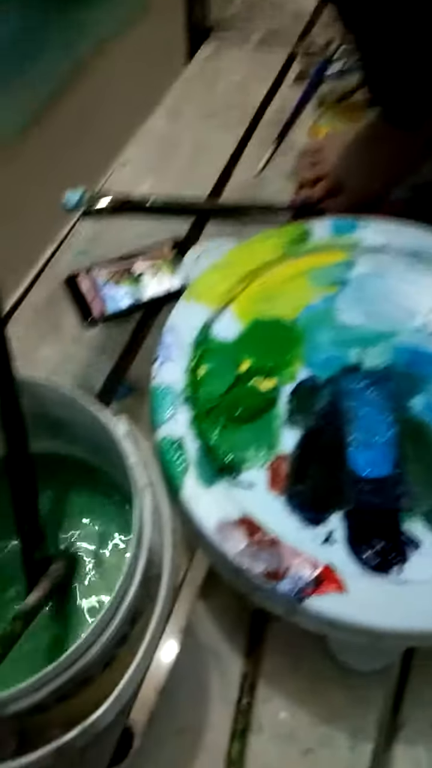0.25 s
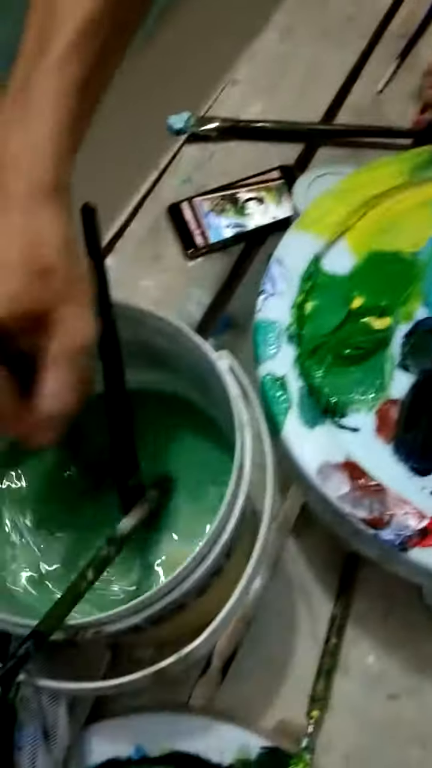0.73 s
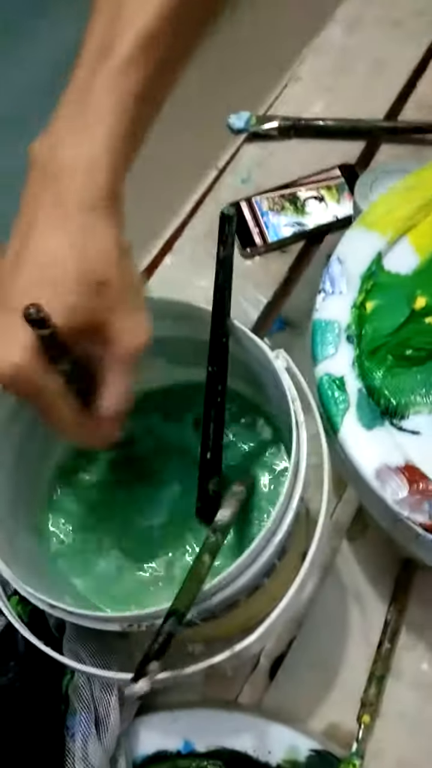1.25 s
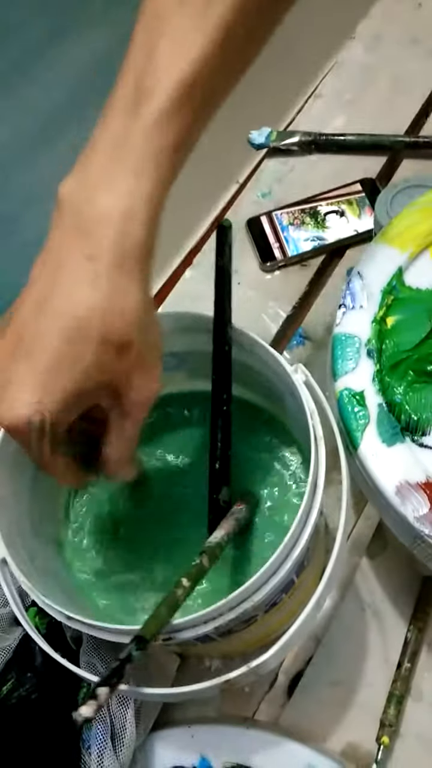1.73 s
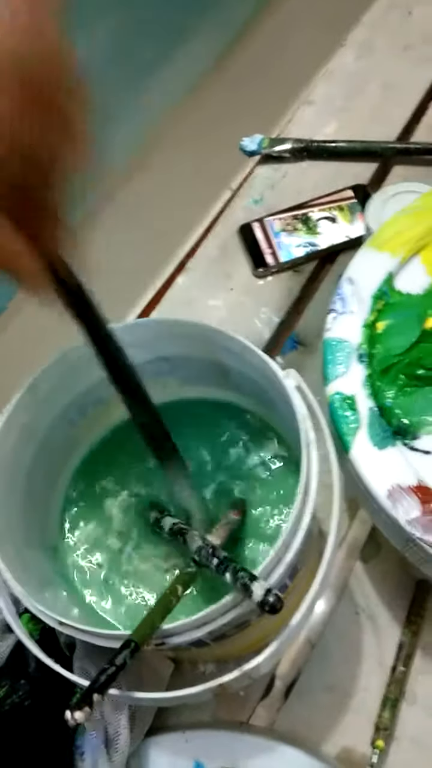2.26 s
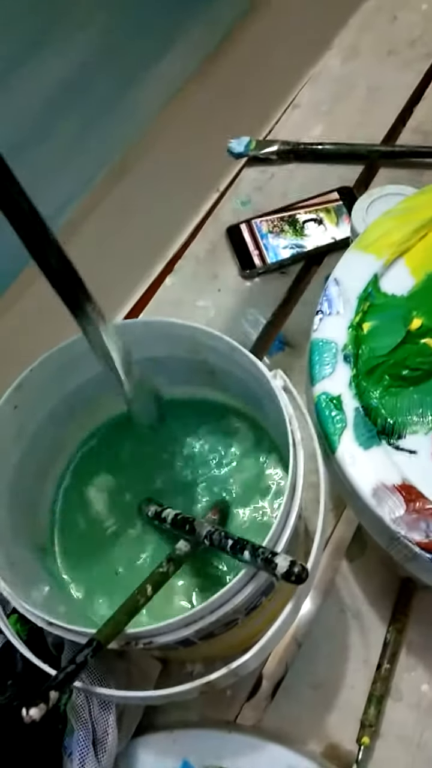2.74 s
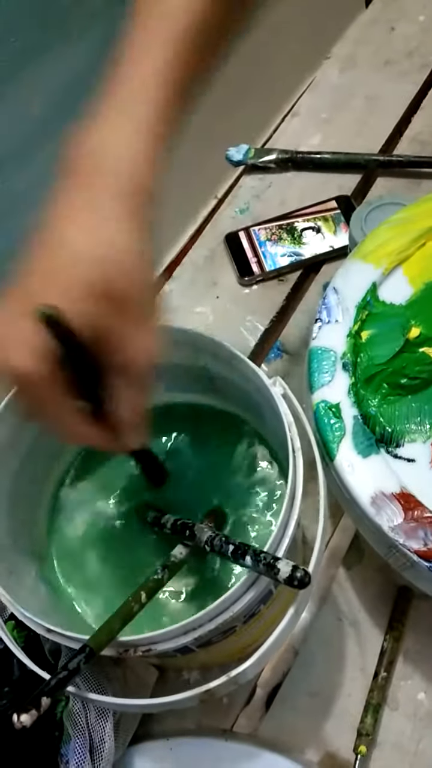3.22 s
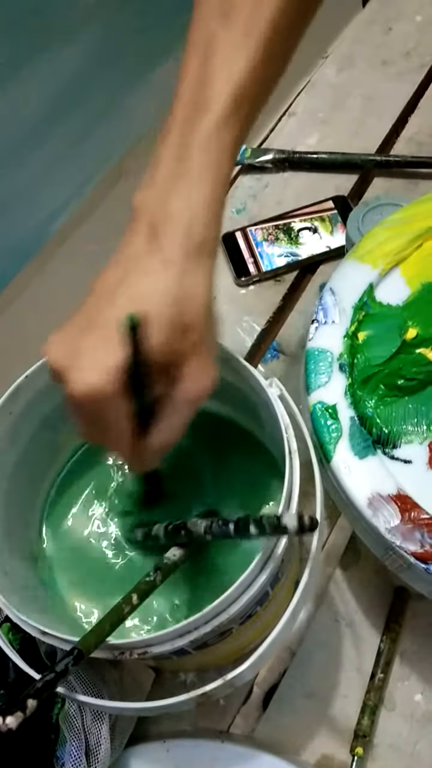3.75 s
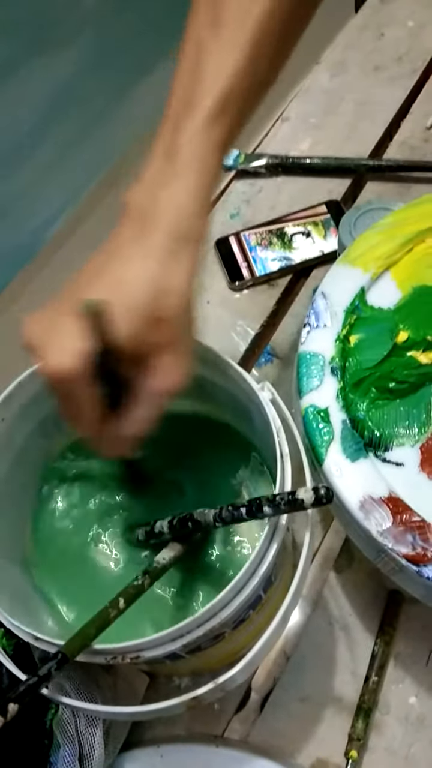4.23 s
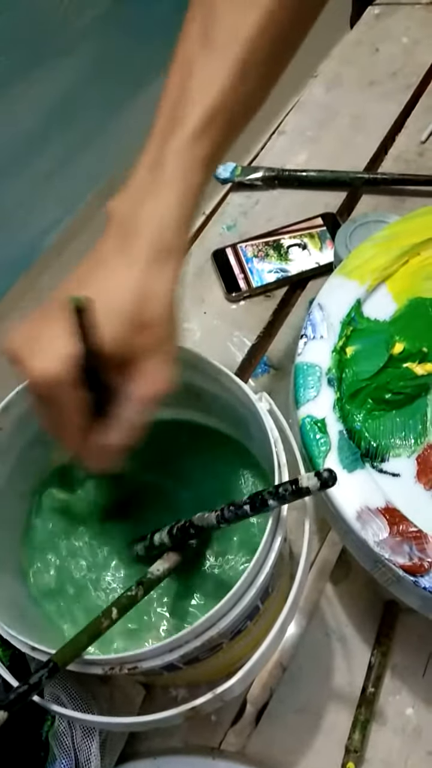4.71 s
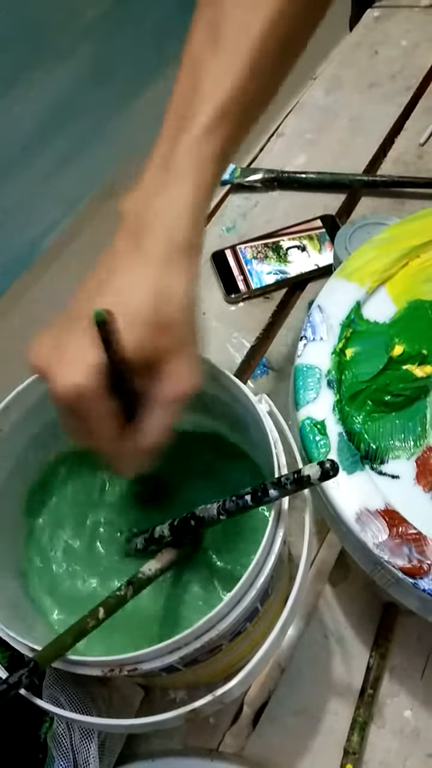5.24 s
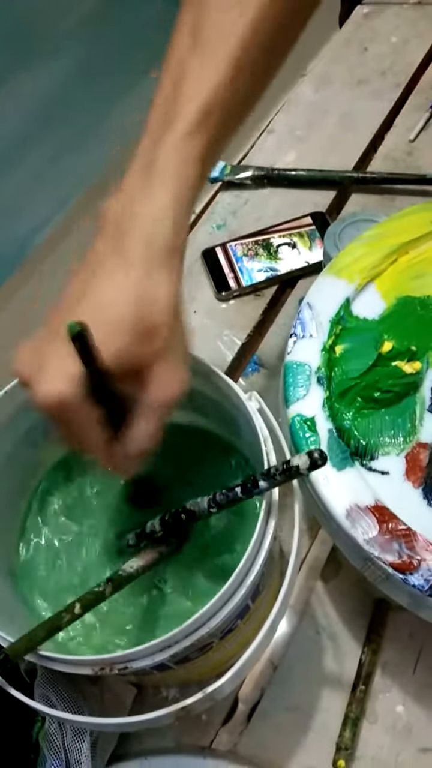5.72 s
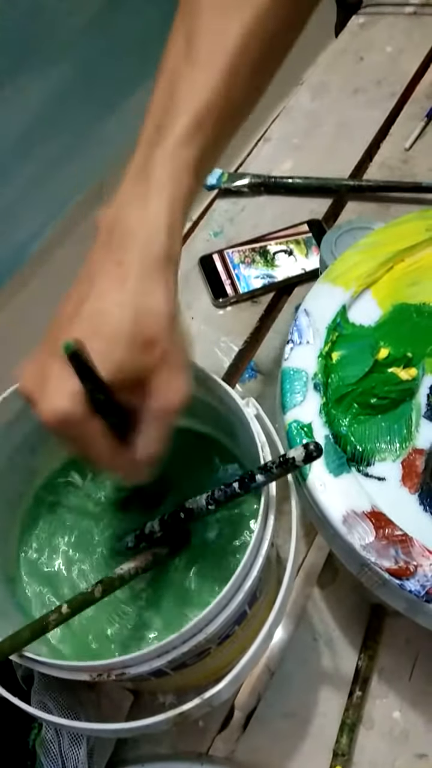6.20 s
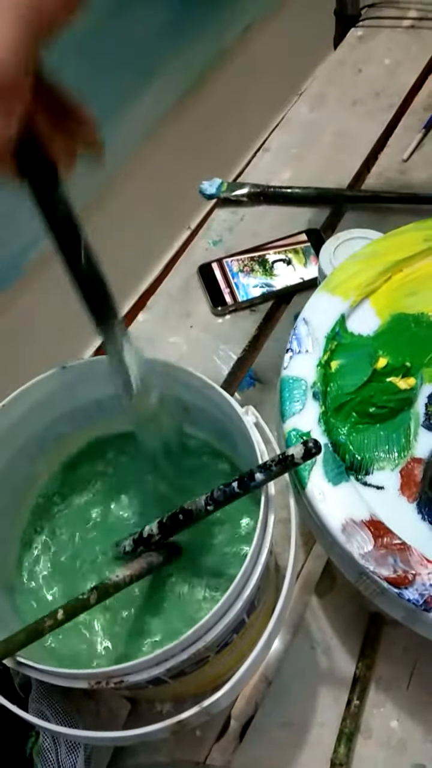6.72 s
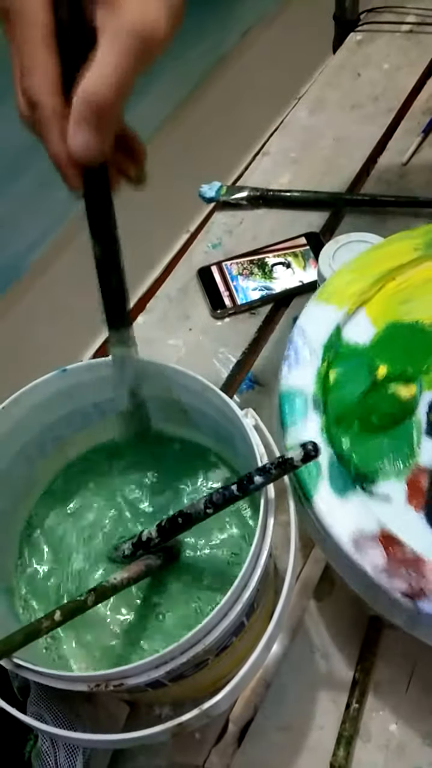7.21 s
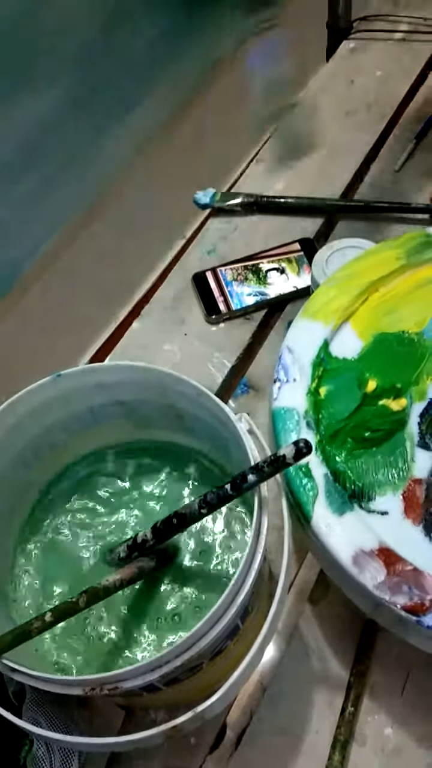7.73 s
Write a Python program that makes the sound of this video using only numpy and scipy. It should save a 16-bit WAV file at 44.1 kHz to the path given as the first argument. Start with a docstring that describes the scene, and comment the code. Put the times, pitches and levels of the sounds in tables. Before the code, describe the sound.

A phone held near a water bucket picks up thin brush handles clicking on its rim and each other, with small thuds in the bench below. Light swishing grows into bubbling, gurgling rinsing and a clatter of knocks, then calms. Two hard, dry taps follow, with a few faint ticks. A live bare room adds short reflections and a diffuse tail; soft hiss and low hum stay underneath.

```python
"""Brush handles clack on a bucket rim and on each other, in a bare room above steady hiss and faint hum.
The water-filled plastic wall bongs, the bench thumps, bubbles plop and bristles crackle as brushes are rinsed.
Blows and contacts drive decaying modes; bubbles are rising tones; bristle crackle is short noise.
The room adds near echoes and a diffuse tail; hiss is shaped noise and hum is narrow-band noise."""
import sys
import numpy as np
from scipy import signal
from scipy.fft import rfft, irfft
from scipy.io import wavfile

SR = 44100
rng = np.random.default_rng(int(sys.argv[2]) if len(sys.argv) > 2 else 0)


def persist_wave(psi):
    """Save psi, clipped to +-1, as 16-bit WAV."""
    counts = np.round(np.clip(psi, -1, 1) * 32767).astype(np.int16)
    wavfile.write(sys.argv[1], SR, np.atleast_2d(counts).T)


N = 351036
SECONDS = np.arange(N) / SR

# Background hiss spectrum before level setting. Each row: frequency in Hz, relative density in dB.
HISS_SPECTRUM = [(20, -40), (42, -24), (55, -11.5), (92, -3.5), (153, -10.5), (213, -4), (400, -8),
                 (515, -6), (987, -14), (1940, -11), (3300, -13), (3800, -15), (6500, -14.5), (7300, -24),
                 (8200, -36.5), (11500, -49), (15500, -46.5)]
# Hums of a distant machine. Each row: centre in Hz, width in Hz, RMS level in dB.
HUMS = [(102, 42, -75), (202.7, 12.5, -60), (439, 33, -62.5)]
# How hard the water is stirred. Each row: time in seconds, slosh level in dB.
STIRRING = [(0, -55.5), (.9, -60), (1.15, -53.5), (1.6, -56), (2.5, -58.5), (3.35, -60.5), (3.8, -56.5),
            (4.15, -52), (4.6, -54), (4.85, -43), (5.15, -47), (5.4, -52), (5.9, -56.5), (6.33, -43.5),
            (6.5, -48.5), (6.65, -59), (7.96, -57.5)]
# Single bubbles. Each row: start in seconds, level in dB, start pitch in Hz.
BUBBLES = [(1.38, -34.5, 2640), (1.6724, -30, 2320), (1.709, -24.5, 2040), (4.081, -26.5, 1294),
           (4.09, -31, 3260), (4.113, -29, 2840), (4.138, -26.5, 1970), (4.4072, -35, 1310),
           (4.4827, -20.5, 1290), (4.5413, -34, 906), (4.712, -19.5, 1146), (4.8276, -14, 1880),
           (4.924, -25.5, 1260), (4.947, -29, 1486), (5.0798, -26, 1810), (5.102, -25, 1880),
           (5.1507, -35, 1980), (5.2185, -28.5, 1975), (5.329, -31.5, 3010), (5.427, -33.5, 1865),
           (5.461, -38.5, 2820), (5.5823, -30, 1260), (5.675, -34, 2010), (5.8735, -34, 1900),
           (5.938, -35, 1960), (6.167, -33, 1850), (6.253, -27, 2930), (6.359, -29.5, 1850),
           (6.417, -27.5, 1815), (6.4527, -32, 1960), (6.531, -35.5, 3270), (7.277, -32.5, 1790),
           (7.45, -32, 1800)]
# Drips and gulps whose cavity closes fast. Each row: start in seconds, level in dB, start pitch in Hz,
# ring time in seconds.
DRIP_EVENTS = [(4.3368, -34.5, 1957, 0.04), (4.92, -34, 1127, 0.1), (6.284, -39, 680, 0.085),
               (6.5298, -28.5, 1820, 0.042)]
# Blows that ring the bucket wall. Each row: start in seconds, peak in dB, gain added to lowest mode in dB.
WALL_BLOWS = [(3.969, -37, -16), (4.11, -28.5, -15), (4.15, -38.5, -7), (4.19, -38, -14), (4.267, -40, -19),
              (4.349, -37, -12), (4.804, -34, -14), (4.839, -32, -10), (5.061, -20, -2), (6.281, -34, 5),
              (6.32, -22, 7), (6.443, -34, 8)]
# Blows that go into the bench. Each row: start in seconds, peak in dB.
BENCH_BLOWS = [(0.364, -44), (0.469, -47), (1.045, -30.5), (1.833, -42), (1.906, -26), (1.968, -31),
               (2.246, -42.5), (2.918, -32), (3.404, -37.5), (3.714, -35.5), (3.851, -34), (7.246, -21.5),
               (7.427, -20)]
# Bristles snapping free. Each row: start in seconds, mode peak in dB, treble edge peak in dB.
BRISTLE_SNAPS = [(1.326, -44, -56), (1.565, -46, -66), (2.803, -40.5, -53), (4.136, -29, -48),
                 (4.318, -36.5, -55), (4.451, -36, -50), (4.5405, -32.5, -60), (4.604, -35, -70),
                 (4.793, -17.5, -47), (5.049, -28, -61), (5.156, -40, -53), (5.2998, -29.5, -62),
                 (5.862, -44, -62), (6.045, -34, -59), (6.1438, -30, -58), (6.1657, -26, -43),
                 (6.219, -31, -76), (6.2534, -39, -72), (6.2648, -26.5, -75), (6.363, -36, -58),
                 (6.469, -34, -72), (7.408, -47, -53)]
# The brush rapped dry on the rim. Each row: start in seconds, hard-mode peak in dB.
RIM_RAPS = [(7.2461, -12.5), (7.427, -11.5), (7.473, -28.5)]
# Handle clacks. Each row: start in seconds, middle peak in dB, low peak in dB, hard peak in dB,
# favoured middle frequency in Hz, favoured hard frequency in Hz.
HANDLE_CLACKS = [(0.3009, -31.5, -45, -26.5, 2000, 5840), (0.9158, -37, -58, -32, 2200, 5440),
                 (1.03, -35, -49, -36, 2600, 5800), (1.043, -13.5, -25, -16.5, 2600, 4500),
                 (1.1655, -29.5, -52, -31, 2090, 4300), (1.666, -35, -64, -30.5, 2250, 5400),
                 (1.909, -7, -22, -3, 2270, 5930), (1.964, -35, -28.5, -15.5, 2180, 4050),
                 (2.247, -34, -55, -38, 2860, 4200), (2.4184, -39.5, -49, -47, 1730, 4100),
                 (2.9171, -25.5, -36, -26.5, 2580, 4080), (3.405, -22.5, -31.5, -24.5, 1840, 4120),
                 (3.5202, -39.5, -44, -48, 2050, 4270), (3.7156, -26, -34, -16, 2280, 5600),
                 (3.8489, -29, -43.5, -35, 2220, 4260), (3.9887, -28.5, -31.5, -22, 1950, 6850),
                 (4.0819, -28, -33, -22, 2100, 5700), (4.1027, -22, -37, -24, 2320, 5300),
                 (4.4773, -21.5, -28.5, -31, 2140, 6100), (4.6955, -38, -39, -13.5, 2100, 6740),
                 (4.707, -14.5, -28, -16, 2110, 6200), (4.782, -17.5, -40, -39, 3200, 6800),
                 (4.803, -13, -23.5, -22, 1970, 4130), (5.025, -29, -60, -63, 1910, 6490),
                 (5.059, -14, -24.5, -23, 1910, 6160), (5.3069, -22.5, -30, -20.5, 2310, 5100),
                 (5.3896, -27, -36, -60, 2030, 4230), (5.5452, -33, -40, -27.5, 1990, 5060),
                 (5.5731, -27, -28.5, -27.5, 1830, 5170), (5.785, -24.5, -31, -23.5, 3080, 4960),
                 (5.8343, -29, -38.5, -38, 2030, 4310), (6.023, -29.5, -37, -27.5, 1790, 6350),
                 (6.103, -28, -41, -50, 2030, 5000), (6.1542, -34, -59, -24, 1850, 4050),
                 (6.2437, -27, -32, -26, 1780, 6000), (6.323, -29.5, -26.5, -55, 2000, 3910),
                 (7.014, -33, -54, -32.5, 3420, 6000), (7.3797, -33, -35, -52, 1800, 4900),
                 (7.5476, -32, -36.5, -44.5, 1723, 3974), (7.7123, -35, -44, -57, 1790, 4760)]

# Modes of the bucket wall. Each row: frequency in Hz, relative level in dB, T60 in seconds.
WALL_MODES = [(442.2, 7, 0.22), (585.4, 7, 0.076), (712, 7.5, 0.018)]
# Modes of the bench. Each row: nominal frequency in Hz, relative level in dB, T60 in seconds.
BENCH_MODES = [(125.3, -11.5, 0.36), (176.8, -2.5, 0.26), (230.6, 5.5, 0.098), (279, -9, 0.24),
               (294, 2.5, 0.22), (372.4, 16.5, 0.028), (447, 4, 0.2), (556, 8, 0.061), (695, -18, 0.11)]
# Low handle and rim modes. Each row: nominal frequency in Hz, relative level in dB, T60 in seconds.
LOW_MODES = [(1030, -10, .015), (1290, 0, .018)]
# Middle handle and rim modes. Each row: nominal frequency in Hz, relative level in dB, T60 in seconds.
MIDDLE_MODES = [(1800, -2, .011), (2070, 0, .012), (2380, -3, .01), (2750, -3, .01), (3100, -5, .01),
                (3400, -4, .01)]
# Hard handle and rim modes. Each row: nominal frequency in Hz, relative level in dB, T60 in seconds.
HARD_MODES = [(4140, -2, .008), (4570, 0, .009), (5100, -3, .007), (5600, -2, .008), (5900, 0, .009),
              (6200, 0, .009), (6640, -6, .008), (7400, -12, .006)]

HISS_RMS_DB = -49
TOP_HZ = 15900
# Room: ROOM_DB sets the whole response, NEAR_DB the near echoes against the diffuse tail.
ROOM_T60_S, ROOM_TREBLE_T60_S, ROOM_RISE_S, ROOM_DB = 0.86, 0.47, .014, -1.5
NEAR_T60_S, NEAR_DB = 0.045, 16
WATER_ROOM_DB, RAP_ROOM_DB = -8, -2.5  # sends into the room
CRACKLE_DB = -19.5  # relative to the small bubbles
PLOP_RING_S = 0.028
PLOP_GLIDE, DRIP_GLIDE = 0.055, 0.73  # half the fractional pitch rise over the ring time
CONTACT_MS, SNAP_MS, RAP_MS = 5.53, 3.5, 1.5
FIRST_TOUCH_DB = 26
GRIP_SPREAD = .015  # standard deviation of the fractional mode shift
FAVOUR_DB_PER_OCTAVE = -20
TICK_DB = -35.5  # treble edge, relative to the hard peak
CLACK_CRACK_DB = -9  # relative to the weaker of middle and hard peaks
RAP_MIDDLE_HZ, RAP_HARD_HZ = 2910, 5630
RAP_MIDDLE_DB, RAP_CRACK_DB = -2.5, -0.5  # relative to the hard peak


def undb(db):
    """Amplitude ratio from dB."""
    return 10 ** (np.asarray(db, float) / 20)


def level(x, db):
    """Scale a signal by its RMS, to db if its RMS is the reference."""
    return x * undb(db) / np.sqrt(np.mean(x ** 2))


def peak_one(x):
    """Scale a signal to peak 1."""
    return x / np.abs(x).max()


def add(track, start_s, sound):
    """Mix a short sound into the track."""
    i = int(start_s * SR)
    track[i:i + len(sound)] += sound[:N - i]


def passband(x, lo_hz, hi_hz, order=3):
    """Butterworth band-pass."""
    return signal.sosfilt(signal.butter(order, [lo_hz, hi_hz], "band", fs=SR, output="sos"), x)


def resonance(x, hz, width_hz):
    """Single narrow resonance."""
    return signal.lfilter(*signal.iirpeak(hz, hz / width_hz, SR), x)


def ring(modes, push, shift=None):
    """Decaying modes driven by a push, band-limited around them; peak 1."""
    t = SECONDS[:int(SR * max(mode[2] for mode in modes)) + 512]
    body = np.zeros(len(t))
    for k, (hz, db, t60_s) in enumerate(modes):
        mode_hz = hz * (1 if shift is None else 1 + shift[k])
        sign = (-1) ** k
        body += sign * undb(db) * np.sin(2 * np.pi * mode_hz * t) * 1000. ** (-t / t60_s)
    driven = signal.fftconvolve(body, push)
    return peak_one(passband(driven, .75 * modes[0][0], 1.2 * modes[-1][0], order=2))


def favour(modes, centre_hz):
    """Where the blow lands sets the mode balance: modes weaken per octave from centre_hz."""
    return [(hz, db + FAVOUR_DB_PER_OCTAVE * abs(np.log2(hz / centre_hz)), t60_s)
            for hz, db, t60_s in modes]


def contact(noise, ms):
    """Rattling contact: noise rises in 0.5 ms under a Gaussian fall of time constant ms."""
    t_ms = SECONDS[:len(noise)] * 1000
    return noise * np.minimum(t_ms / .5, 1) * np.exp(-(t_ms / max(ms, .3)) ** 2)


def blow(noise, ms):
    """Contact rattle with one sharp touch near its start."""
    return contact(noise, ms) + undb(FIRST_TOUCH_DB) * signal.unit_impulse(len(noise), 16)


def tick(push):
    """Thin treble edge of a contact; peak 1."""
    return peak_one(passband(push, 7200., 15800.))


def bubble(hz, ring_s, glide):
    """Bubble nearing the surface: a rising tone that falls 60 dB in ring_s."""
    t = SECONDS[:int(ring_s * SR) + 8]
    phase = 2 * np.pi * hz * (t + glide * t ** 2 / ring_s)
    attack = np.minimum(t / 0.00095, 1)
    return np.sin(phase) * attack * 1000. ** (-(t / ring_s) ** 1.3)


def background():
    """Smooth hiss of room and microphone, with narrow-band hums of a distant machine."""
    hz, db = np.transpose(HISS_SPECTRUM)
    bin_hz = np.fft.rfftfreq(N, 1 / SR)
    shape = undb(np.interp(np.log(bin_hz + 1), np.log(hz), db))
    out = level(irfft(rfft(rng.standard_normal(N)) * shape, N), HISS_RMS_DB)
    for hum_hz, width_hz, hum_db in HUMS:
        out += level(resonance(rng.standard_normal(N), hum_hz, width_hz), hum_db)
    return out


def room(sent):
    """Near echoes in the bucket and off the bench, then a diffuse tail whose treble dies sooner."""
    t, noise = SECONDS[:SR], rng.standard_normal(SR)
    tail = passband(noise, 60., 7200.) * 1000. ** (-t / ROOM_T60_S)
    tail += passband(noise, 7200., 16500.) * 1000. ** (-t / ROOM_TREBLE_T60_S)
    near = undb(NEAR_DB) * noise * 1000. ** (-t / NEAR_T60_S) * (t > .002)
    response = tail * np.minimum(t / ROOM_RISE_S, 1) + near
    response /= np.sqrt(np.sum(response ** 2))
    return undb(ROOM_DB) * signal.fftconvolve(sent, response)[:N]


def small_bubbles():
    """Many small rising tones; the air column over the water favours three pitches."""
    out = np.zeros(N)
    for when, pitch, size in rng.random((7000, 3)):
        tone = bubble(950 * 4. ** pitch, .012, .1)
        add(out, when * (N - 1) / SR, tone * undb(10 * size ** 3))
    low = resonance(out, 1368.0, 140.0) * 1.65
    middle = resonance(out, 1720.0, 230.0) * 0.8
    high = resonance(out, 3130.0, 340.0) * 1.3
    return out + low + middle + high


def bristle_crackle():
    """Short noise contacts with a faint treble edge."""
    out = np.zeros(N)
    for noise, (when, size) in zip(rng.standard_normal((260, 256)), rng.random((260, 2))):
        push = contact(noise, 2.5) * undb(14 * size ** 2)
        treble = undb(-32) * passband(push, 7200., 15800.)
        add(out, when * (N - 1) / SR, passband(push, 3200., 6800.) + treble)
    return out


def water():
    """Small bubbles and bristle crackle whose level follows the stirring."""
    slosh = level(small_bubbles(), 0) + level(bristle_crackle(), CRACKLE_DB)
    return slosh * undb(np.interp(SECONDS, *np.transpose(STIRRING)))


def plops():
    """Bubbles and drips that stand out: single rising tones, steeper for drips."""
    out = np.zeros(N)
    for start_s, db, hz in BUBBLES:
        add(out, start_s, undb(db) * bubble(hz, PLOP_RING_S, PLOP_GLIDE))
    for start_s, db, hz, ring_s in DRIP_EVENTS:
        add(out, start_s, undb(db) * bubble(hz, ring_s, DRIP_GLIDE))
    return out


def thumps():
    """Very short smooth pushes ring the bench modes, shifted a little each time."""
    out, push = np.zeros(N), np.hanning(int(0.00035 * SR))
    shifts = rng.standard_normal((len(BENCH_BLOWS), len(BENCH_MODES)))
    for (start_s, db), shift in zip(BENCH_BLOWS, shifts):
        add(out, start_s, undb(db) * ring(BENCH_MODES, push, 0.044 * shift))
    return out


def bongs():
    """Soft pushes ring the water-filled wall, its lowest mode weighted per blow."""
    out, push = np.zeros(N), np.hanning(int(0.0021 * SR))
    (hz, low_db, t60_s), *upper = WALL_MODES
    for start_s, db, lowest_db in WALL_BLOWS:
        modes = [(hz, low_db + lowest_db, t60_s), *upper]
        add(out, start_s, undb(db) * ring(modes, push))
    return out


def snaps():
    """Bristles snapping free: a noise contact rings the hard modes and gives a tick."""
    out = np.zeros(N)
    for (start_s, db, tick_db), noise in zip(BRISTLE_SNAPS, rng.standard_normal((len(BRISTLE_SNAPS), 1024))):
        push = contact(noise, SNAP_MS)
        add(out, start_s, undb(db) * ring(HARD_MODES, push))
        add(out, start_s, undb(tick_db) * tick(push))
    return out


def raps():
    """Short hard contacts at one spot of the rim: fixed mode balance, crack and tick."""
    out = np.zeros(N)
    hard, middle = favour(HARD_MODES, RAP_HARD_HZ), favour(MIDDLE_MODES, RAP_MIDDLE_HZ)
    for (start_s, db), noise in zip(RIM_RAPS, rng.standard_normal((len(RIM_RAPS), 1024))):
        rattle, push = contact(noise, RAP_MS), blow(noise, RAP_MS)
        crack = peak_one(passband(rattle, 700., 6400., order=6))
        add(out, start_s, undb(db) * ring(hard, push))
        add(out, start_s, undb(db + RAP_MIDDLE_DB) * ring(middle, push))
        add(out, start_s, undb(db + RAP_CRACK_DB) * crack)
        add(out, start_s, undb(db + TICK_DB) * tick(rattle))
    return out


def clacks():
    """Each contact shakes three groups of handle and rim modes, cracks and gives a dry tick."""
    out = np.zeros(N)
    for row, noise in zip(HANDLE_CLACKS, rng.standard_normal((len(HANDLE_CLACKS), 1024))):
        start_s, middle_db, low_db, hard_db, middle_hz, hard_hz = row
        rattle, push = contact(noise, CONTACT_MS), blow(noise, CONTACT_MS)
        shift = GRIP_SPREAD * noise[-8:]
        crack = peak_one(passband(rattle, 1400., 6600., order=5))
        add(out, start_s, undb(low_db) * ring(LOW_MODES, push, shift))
        add(out, start_s, undb(middle_db) * ring(favour(MIDDLE_MODES, middle_hz), push, shift))
        add(out, start_s, undb(hard_db) * ring(favour(HARD_MODES, hard_hz), push, shift))
        add(out, start_s, undb(min(middle_db, hard_db) + CLACK_CRACK_DB) * crack)
        add(out, start_s, undb(hard_db + TICK_DB) * tick(rattle))
    return out


def scene():
    """Sum the sources, their room response and the background."""
    blows = clacks() + snaps() + bongs() + thumps()
    rapped, wet = raps(), plops() + water()
    # the bucket aims the water sounds upward, so less of them fills the room
    sent = blows + undb(RAP_ROOM_DB) * rapped + undb(WATER_ROOM_DB) * wet
    return (blows + rapped + wet + room(sent) + background())[None]


def record(dry):
    """The phone cuts the top: steep elliptic low-pass at TOP_HZ."""
    return signal.sosfilt(signal.ellip(8, .2, 70, TOP_HZ, fs=SR, output="sos"), dry)


dry = scene()
out = record(dry)
persist_wave(out)
```